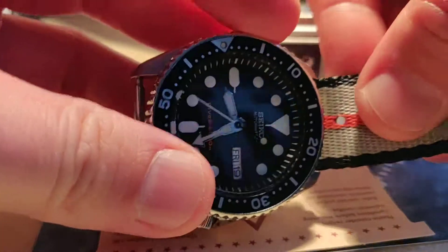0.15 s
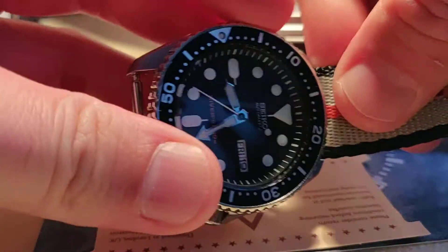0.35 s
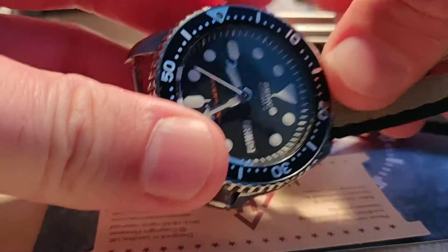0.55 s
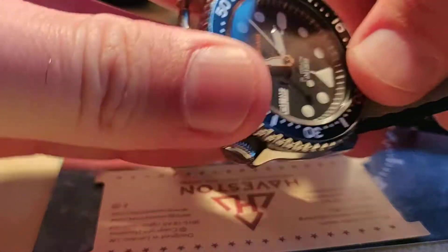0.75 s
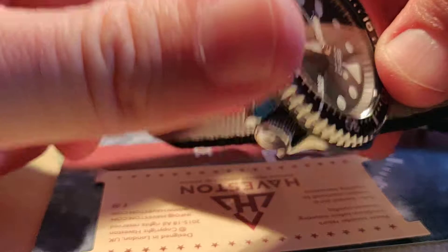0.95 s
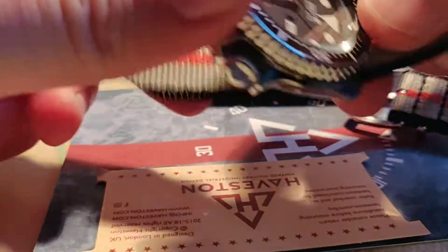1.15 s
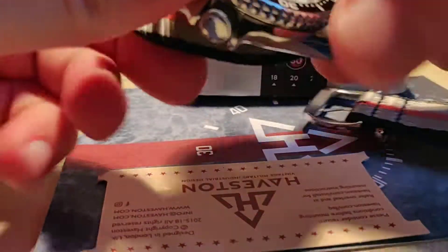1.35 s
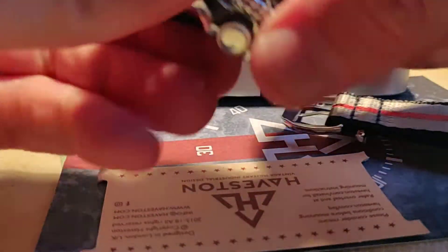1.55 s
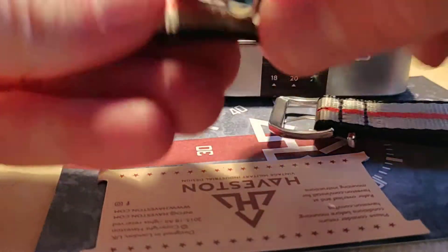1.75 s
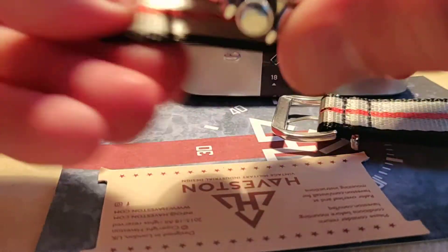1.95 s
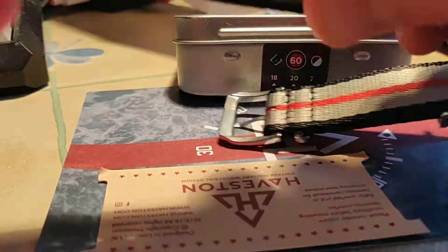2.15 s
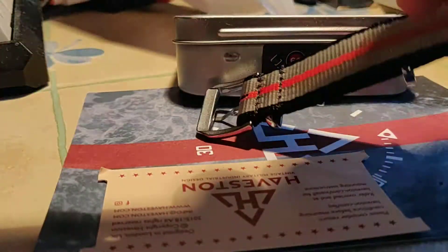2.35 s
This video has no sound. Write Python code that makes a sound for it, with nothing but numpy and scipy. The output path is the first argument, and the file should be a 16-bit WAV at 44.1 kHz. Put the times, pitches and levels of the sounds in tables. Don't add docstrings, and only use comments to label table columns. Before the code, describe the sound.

Steel buckle clinks sharply on a hollow tin, rattles and drags, then a woven strap rubs past

```python
import sys
import numpy as np
from scipy import signal
from scipy.io import wavfile
from scipy.ndimage import uniform_filter1d

SR = 44100
rng = np.random.default_rng(int(sys.argv[2]) if len(sys.argv) > 2 else 0)


def unload_wav(signal):
    wavfile.write(
        sys.argv[1],
        SR,
        np.round(np.clip(np.atleast_2d(signal).T, -1, 1) * 32767).astype(np.int16),
    )


def volts_from_decibels(level):
    exponent = np.asarray(level, float) / 20
    return 10 ** exponent


N = 110250

# frequency in Hz, correlation from -1 to 1.
STEREO_LIKENESS = [(25, 0.2), (50, 0.41), (90, -0.3), (240, 0.85), (950, 0.28), (3770, -0.26),
                   (15000, -0.14)]
# frequency in Hz, level in dB per Hz.
AIR_SPECTRUM = [(20, -0.5), (55, -24), (100, -12), (200, -8.5), (700, -16), (1500, -27.5), (9000, -33),
                (16000, -33)]
# centre in Hz, width in Hz, level in dB.
HUMS = [(90, 10, -69), (200, 25, -76)]
# start in seconds, peak in dB, centre in Hz, left over right in dB.
KEEPER_TICKS = [(.202, -41, 8100, -5), (.5405, -53, 6400, -6), (.5746, -49, 3300, -2),
                (.856, -41, 7400, -5), (1.3625, -50, 5700, 3), (1.399, -42, 5200, -2),
                (2.0433, -40, 6500, 0), (2.0514, -41, 6400, 1), (2.0625, -42, 3000, 1),
                (2.144, -36, 6000, 4), (2.308, -47, 5800, 2), (2.3346, -40, 14500, -2),
                (2.3346, -44, 4000, 1), (2.4138, -52, 14500, 0), (.4225, -49, 4500, 1),
                (.674, -33, 4800, 2), (.7285, -39, 5200, 2), (.9055, -46, 4000, 1), (.9615, -49, 5000, 1)]
# frequency in Hz, level in dB, t60 in seconds.
TIN_MODES = [(643.3, -10.5, 0.049), (696, -6.5, 0.035), (785.6, 2.5, .045), (886.3, 3, 0.052),
             (965, -7, 0.017), (1189.4, -6.5, 0.06), (1255, -10.5, 0.016), (1584, -36, 0.078),
             (1708, -17.5, 0.041), (1813, -17, 0.049), (2188, -12, .045), (2567, -27, .06),
             (2940, -25, 0.071), (3239, -22, 0.081),
             (3920, -21.5, .035), (4250, -24, .04), (5440, -27, .035), (6150, -27.5, 0.03),
            (6610, -31, 0.04), (8180, -23, .022)]
# frequency in Hz, level in dB.
CROWD_LEVEL = [(1000, -33.5), (2000, -27.5), (4000, -31.5), (8000, -39), (11000, -54.5), (15000, -47.5)]
# frequency in Hz, t60 in seconds.
CROWD_T60 = [(1000, .055), (16000, .035)]
# delay in seconds, level in dB.
BOUNCES = [
    (.003, -5),
    (.0068, -7.5),
    (0.0105, -13.5),
]
# start in seconds, peak in dB, lean to the lower of the main modes in dB,
# brightness in dB per octave, extra of the middle modes in dB.
KNOCKS = [(0.234, -3, -0.5, 0.5, 1.5), (0.387, -44.5, 6, -2, 4), (0.423, -31, 1, -2.5, 3),
          (0.676, -19.5, -2, -1.5, -2.5), (0.729, -26, 0.5, -1, -2), (0.783, -40.5, -10, 0, 6),
          (0.82, -37, 0.5, -4.5, 1), (0.906, -24, -1, -4.5, -1), (0.962, -30.5, -2.5, -4, 0),
          (0.977, -42, -11, -3, 8), (1.096, -50, -8, 3, 20), (1.4, -42.5, 5, 1.5, 2.5),
          (2.064, -38.5, -4, 0, 6)]
# start in seconds, length in seconds, level in dB, brightness in dB per octave.
DRAGS = [(0.275, 0.1, -55.5, 0), (0.532, 0.095, -54, 0.5), (0.687, 0.041, -51.5, -1.5),
         (0.733, 0.091, -54.5, -1.5), (0.802, 0.094, -52, 0), (1.079, 0.047, -51.5, -12.5),
         (1.144, 0.098, -54, -3), (1.261, 0.11, -49.5, 1.5), (1.309, 0.0735, -49, 0),
         (2.478, 0.061, -59.5, 5.5)]
# start in seconds, peak in dB, lean in dB, centre of the ring in Hz.
SLIPS = [(.5435, -44, -0.5, 788), (.554, -44.5, 5, 820), (.562, -38, -0.5, 832), (.579, -44, 6, 825),
         (.586, -43.5, -8, 820), (.599, -41, -2, 854), (1.091, -45.5, 7.5, 806), (1.097, -34.5, 2.5, 812),
         (1.158, -45.5, 6, 794), (1.171, -42, 22, 811), (1.179, -38.5, -4.5, 832), (1.19, -39.5, -4, 803),
         (1.244, -47.5, 2.5, 777), (1.263, -45, 9, 800), (1.271, -37.5, -5.5, 785), (1.288, -32.5, 7, 835),
         (1.303, -37, 2.5, 815), (1.315, -38.5, -7, 800), (1.329, -52, 2, 816), (1.336, -44.5, -2, 790),
         (1.344, -50, 5, 768), (1.353, -49, 0, 770), (1.364, -46, 1, 753), (.7125, -33, -6, 822)]
# time in seconds, ribs a second in Hz, level in dB.
PULL_A = [(1.93, 42, -66), (1.975, 90, -59), (2.02, 150, -53), (2.08, 185, -63)]
PULL_B = [(2.075, 108, -62), (2.11, 104, -58), (2.14, 125, -56), (2.17, 137, -55), (2.205, 108, -56),
          (2.24, 85, -58), (2.268, 72, -60)]
PULL_C = [(2.262, 95, -62), (2.285, 126, -49.5), (2.32, 110, -53), (2.35, 104, -54), (2.37, 75, -58),
          (2.388, 55, -60)]
PULL_D = [(2.375, 50, -63), (2.41, 110, -58), (2.45, 160, -50), (2.48, 130, -56), (2.51, 90, -60)]
PULL_PAN_DB = (9.6, 12.0, 14, 16)
RIB_OVERTONE_DB = (-9, -1.5, -8.5, -9)
# time in seconds, level in dB.
RUB_LEVEL = [(.49, -97.5), (.535, -62), (.57, -75.5), (1.2, -75), (1.29, -56.5), (1.36, -59.5),
             (1.41, -75.5), (1.9, -80), (2.0, -62), (2.06, -54), (2.17, -58.5), (2.28, -60.5), (2.32, -59),
             (2.36, -60.5), (2.39, -66), (2.42, -58), (2.45, -55), (2.5, -60.5)]
# frequency in Hz, level in dB per Hz.
WEAVE_SPECTRUM = [(200, -29.5), (400, -6), (1000, -13), (2200, -13.5), (4000, -18), (9000, -22.5),
                  (11500, -24.5), (15500, -17.5)]
# start in seconds, level in dB, frequency in Hz.
TABLE_BUMPS = [
    (0.857, -45, 131),
    (0.861, -44.5, 301),
    (1.549, -50.5, 334),
]
# start in seconds, peak in dB, centre in Hz.
MAT_TAPS = [(1.536, -55, 6470), (1.693, -55.5, 1790), (2.0488, -42.5, 2180), (2.0617, -39, 1680),
            (2.0635, -40, 276), (2.1278, -44, 2050), (2.13, -42, 830), (2.138, -45.5, 840),
            (2.147, -39.5, 300), (2.155, -48, 795), (2.1842, -43.5, 2270), (2.205, -50.5, 1990),
            (2.243, -53, 2050), (2.4147, -50, 3200)]
# time in seconds, frequency in Hz, level in dB.
SQUEAK_GLIDE = [(1.253, 8170, -68.5), (1.287, 8450, -84), (1.33, 8360, -58.5), (1.355, 8056, -69.5),
                (1.375, 8030, -84)]
# mean frequency in Hz, level in dB, delay in seconds.
SQUEAK_PARTIALS = [(8300, 1, -0.0038), (6100, -2, -0.052), (5000, 2.5, -.015), (6400, -2.5, 0.0061),
                   (4100, -7, -0.024), (3200, -1, -.025), (3000, 0, .01)]
# frequency in Hz, t60 in seconds.
ROOM_T60 = [(300, 0.61), (900, 0.2), (3000, 0.21), (10000, 0.28)]


def evened(x):
    return x / np.sqrt(np.mean(x ** 2) + 1e-20)


def read(points, hz):
    f, value = np.transpose(points)
    return np.interp(np.log(hz + 1), np.log(f + 1), value)


def add(mix, s, sound):
    part = mix[:, round(s * SR):][:, :sound.shape[1]]
    part += sound[:, :part.shape[1]]


def sides(pan_db):
    return volts_from_decibels(np.array([[pan_db / 2], [-pan_db / 2]]))


def resonate(x, hz, width_hz):
    return signal.lfilter(*signal.iirpeak(min(hz, SR / 2 - 2000), hz / width_hz, SR), x)


def correlate(left, other, hz):
    like = np.clip(read(STEREO_LIKENESS, hz), -1, 1)[:, None]
    return np.array([left, like * left + np.sqrt(1 - like ** 2) * other])


def noise(shape, patchy_db):
    hz = np.fft.rfftfreq(1024, 1 / SR)
    a, b, c, d, patches = rng.standard_normal((N // 256 + 5, 513, 5)).T
    patches = uniform_filter1d(patches, size=10, axis=0)
    patches = evened(uniform_filter1d(patches, size=10, axis=1))
    z = correlate(a + 1j * b, c + 1j * d, hz)
    z = z * volts_from_decibels(read(shape, hz)[:, None] + patchy_db * patches)
    return evened(signal.istft(z, nperseg=1024, noverlap=768)[1][:, :N])


def air():
    out = volts_from_decibels(-61.5) * noise(AIR_SPECTRUM, patchy_db=1.0)
    t = np.arange(N) / SR
    for hz, width_hz, db in HUMS:
        fuzz = resonate(rng.standard_normal((2, N)), hz, width_hz)
        fuzz = evened(resonate(fuzz, hz, 2 * width_hz))
        out = out + volts_from_decibels(db) * evened(fuzz + 1.6 * np.sin(2 * np.pi * hz * t))
    return sides(1) * out


def keepers():
    out, t = np.zeros((2, N)), np.arange(600) / SR
    for s, db, hz, pan_db in KEEPER_TICKS:
        snap = rng.standard_normal((2, 600)) * np.exp(-t / .001)
        ring = resonate(snap[:1] + .5 * snap, hz, .45 * hz)
        snap = .1 * np.diff(snap, prepend=0) + ring
        add(out, s, volts_from_decibels(db) * sides(pan_db) * snap / abs(snap).max())
    return out


def modes():
    crowd_hz = np.sort(rng.uniform(1000, 16000, size=300))
    crowd = np.transpose([crowd_hz, read(CROWD_LEVEL, crowd_hz), read(CROWD_T60, crowd_hz)])
    hz, db, t60 = np.vstack([TIN_MODES, crowd]).T
    t = np.arange(5000) / SR
    return hz, db, volts_from_decibels(-60 * t / t60[:, None]) * np.exp(2j * np.pi * hz[:, None] * t)


def tin(body, lean_db, bright_db, middle_db, scatter=1.0):
    hz, db, phasors = body
    luck = scatter * rng.standard_normal((len(hz), 3))
    t = np.arange(5000) / SR
    octaves = np.log2(hz / 820)
    above, upper, treble = np.maximum(octaves, 0), hz > 1050, hz > 7500

    db = db - lean_db * np.tanh(12 * octaves) * ~upper
    db = db + above * bright_db + middle_db * upper * (hz < 2700)
    db = db + 3 * np.tanh(luck[:, 0]) * np.where(upper, 1, .3)

    port_lag_s = .00004
    lag = 2 * np.pi * hz * port_lag_s * (1 + above) * luck[:, 1] * (hz < 7500)
    phase = np.outer([1, -1], lag) + luck[:, 2] * upper
    start = (-1.) ** np.arange(len(hz)) * volts_from_decibels(db) * np.exp(1j * phase)
    start = start * np.where(treble, sides(-6), 1)

    crack = np.diff(rng.standard_normal((2, 5000)), prepend=0)
    crack = crack * volts_from_decibels(-28 + 2.6 * bright_db) * np.exp(-t / .004)
    thud = volts_from_decibels(-35.5) * np.sin(2 * np.pi * 250 * t) * np.exp(-t / .008)
    rise = np.minimum(t / 0.00033, 1)
    clink = ((start * upper @ phasors).imag + crack) * rise
    out = ((start * ~upper @ phasors).imag + thud) * rise + clink
    for (s, bounce_db), jitter in zip(BOUNCES, luck[:, 1]):
        add(out, s * (1 + .04 * jitter), volts_from_decibels(bounce_db) * clink)
    return out / abs(out).max()


def knocks(body):
    out, lead_s = np.zeros((2, N)), 0.0018
    for s, db, *colour in KNOCKS:
        add(out, s - lead_s, volts_from_decibels(db) * tin(body, *colour))
    return out


def drags(body):
    out, slips_per_s = np.zeros((2, N)), 380
    for s, length, db, bright_db in DRAGS:
        draw = rng.random(9000)
        size = np.minimum(rng.exponential(1, 9000), 3)
        sign = rng.choice([-1, 1], 9000)
        u = np.arange(9000) / SR / length
        pressure = np.sin(np.pi * np.minimum(u, 1) ** .7)
        force = 0.18 * size + (draw < slips_per_s / SR) * volts_from_decibels(5.5 * size)
        blow = tin(body, 4.2, bright_db, 0.0, scatter=.3)
        drag = signal.fftconvolve((force * sign * pressure)[None], blow, axes=1)
        add(out, s, volts_from_decibels(db) * drag / np.sqrt((drag ** 2).sum() / (2 * length * SR)))
    return out


def separate_slips(body):
    out, n, lead_s = np.zeros((2, N)), np.arange(5000), 0.0018
    for s, db, lean_db, ring_hz in SLIPS:
        blow = tin(body, lean_db, -7, -1.5, scatter=.3)
        shifted = np.array([np.interp(n * ring_hz / 820, n, side) for side in blow])
        add(out, s - lead_s, volts_from_decibels(db) * shifted)
    return out


def buckle():
    body = modes()
    return knocks(body) + drags(body) + separate_slips(body)


def strap():
    t, out, gate = np.arange(N) / SR, np.zeros((2, N)), np.ones(N)
    pulls = (PULL_A, PULL_B, PULL_C, PULL_D)
    for pull, pan_db, overtone_db in zip(pulls, PULL_PAN_DB, RIB_OVERTONE_DB):
        s, hz, db = np.transpose(pull)
        wobble = evened(uniform_filter1d(rng.standard_normal(N), size=500))
        turn = 2 * np.pi * np.cumsum(np.interp(t, s, hz) * (1 + .03 * wobble)) / SR
        level = uniform_filter1d(volts_from_decibels(np.interp(t, s, db, -120, -120)), size=600)
        purr = np.sin(turn) + volts_from_decibels(overtone_db) * np.sin(2 * turn + .5 * wobble)
        out += sides(pan_db) * level * np.sqrt(2) * purr
        gate *= 1 + .25 * level / level.max() * np.sin(turn)
    hiss = noise(WEAVE_SPECTRUM, patchy_db=1.5)
    edge = evened(resonate(hiss, 6290, 710))
    hiss = hiss + volts_from_decibels(-2) * np.array([[1], [.25]]) * gate ** 2 * edge
    grain_db = 2.2 * evened(uniform_filter1d(rng.standard_normal(N), size=120))
    return out + sides(-1.5) * hiss * volts_from_decibels(np.interp(t, *np.transpose(RUB_LEVEL)) + grain_db)


def hands():
    out, t = np.zeros((2, N)), np.arange(2000) / SR
    for s, db, hz in TABLE_BUMPS:
        swell = np.e * t / 0.0039 * np.exp(-t / 0.0027)
        add(out, s, volts_from_decibels(db) * np.ones((2, 1)) * np.sin(2 * np.pi * hz * t) * swell)
    for s, db, hz in MAT_TAPS:
        puff = rng.standard_normal((2, 2000)) * np.exp(-t / 0.0039)
        puff = resonate(puff[:1] + .5 * puff, hz, .9 * hz)
        puff = resonate(puff, hz, 2 * hz)
        add(out, s, volts_from_decibels(db) * puff / abs(puff).max())
    return out


def squeak():
    t, out = np.arange(N) / SR, 0
    s, hz, db = np.transpose(SQUEAK_GLIDE)
    for partial_hz, partial_db, delay in SQUEAK_PARTIALS:
        flutter = evened(uniform_filter1d(rng.standard_normal((2, N)), size=350))
        flutter = evened(flutter + flutter[:1])
        glide_hz = np.interp(t - delay, s, hz) * partial_hz / hz.mean()
        turn = 2 * np.pi * np.cumsum(glide_hz) / SR
        level = volts_from_decibels(np.interp(t - delay, s, db, -120, -120) + partial_db)
        out = out + level * flutter * np.sin(turn)
    return out


def room(x):
    taps = np.zeros((2, SR // 2))
    at = np.arange(140, SR // 2 - 20, 20) + rng.integers(0, 20, (2, (SR // 2 - 141) // 20))
    np.put_along_axis(taps, at, rng.choice([-1., 1.], at.shape), 1)
    hz, t, z = signal.stft(taps, SR, nperseg=256)
    z = correlate(z[0], z[1], hz)
    tail = signal.istft(z * volts_from_decibels(-60 * t / read(ROOM_T60, hz)[:, None]), SR, nperseg=256)[1]
    return signal.fftconvolve(x, tail / np.linalg.norm(tail[0]), axes=1)[:, :N]


def scene():
    no_bass = signal.butter(2, 140, "high", fs=SR, output="sos")
    steel = signal.sosfilt(no_bass, buckle()) + keepers() + squeak()
    return steel + volts_from_decibels(-15.5) * room(steel) + strap() + hands() + air()


def top_cut(x):
    return signal.sosfilt(signal.butter(12, 16100, fs=SR, output="sos"), x)


def record(dry):
    band = signal.sosfilt(signal.butter(14, 15900, fs=SR, output="sos"), dry)
    return top_cut(band)


dry = scene()
out = record(dry)
unload_wav(out)
```